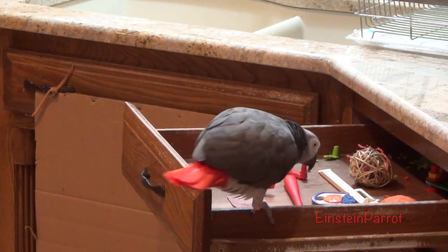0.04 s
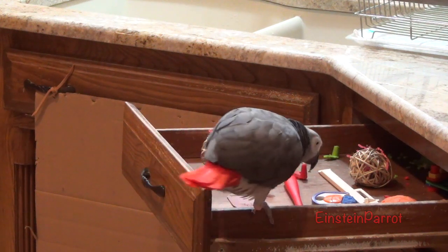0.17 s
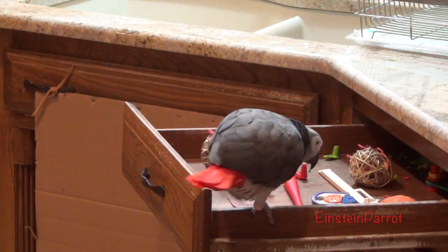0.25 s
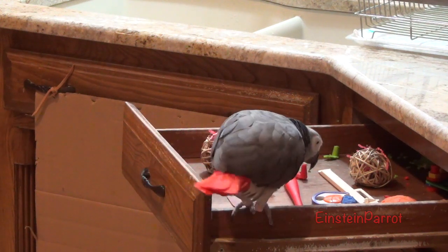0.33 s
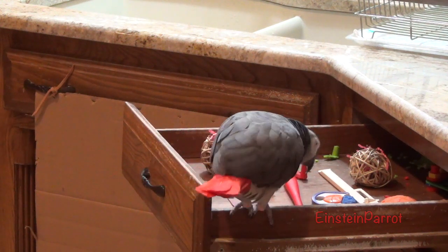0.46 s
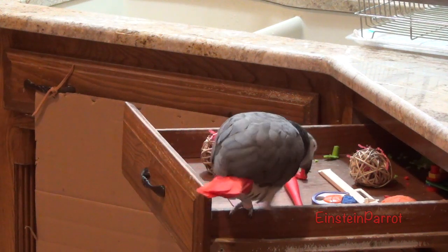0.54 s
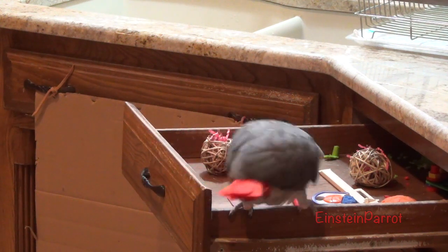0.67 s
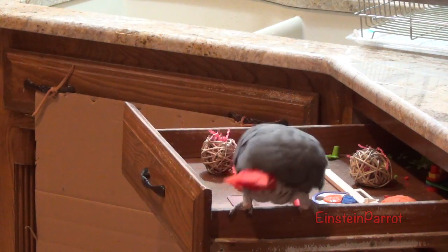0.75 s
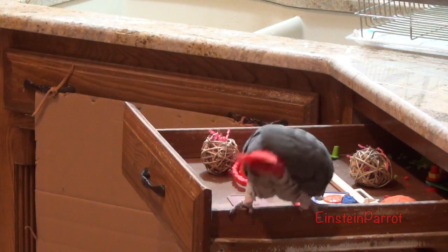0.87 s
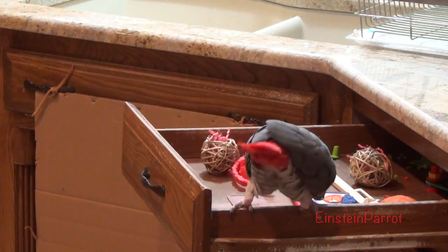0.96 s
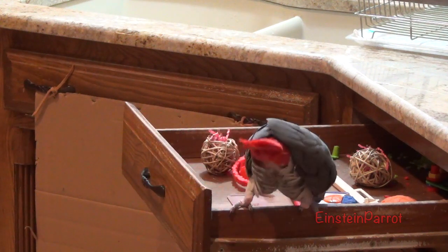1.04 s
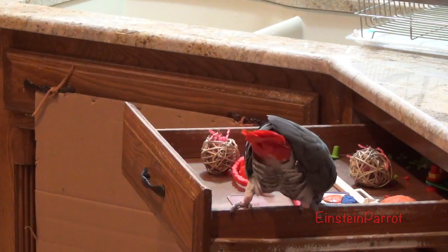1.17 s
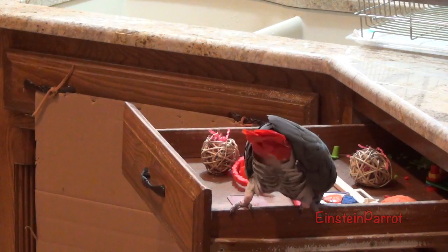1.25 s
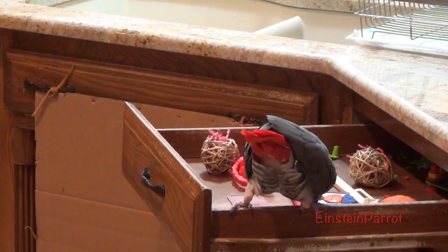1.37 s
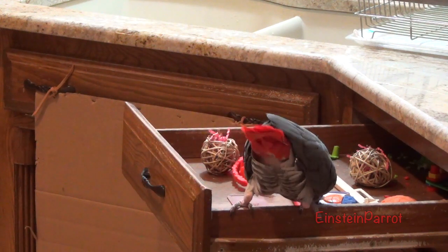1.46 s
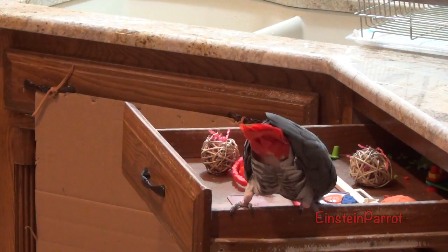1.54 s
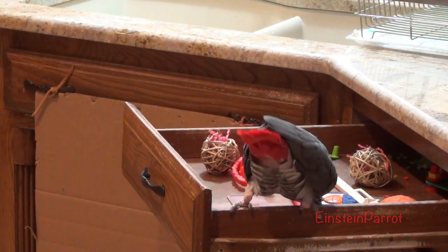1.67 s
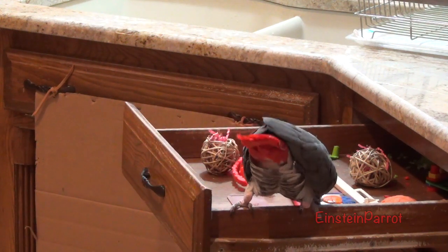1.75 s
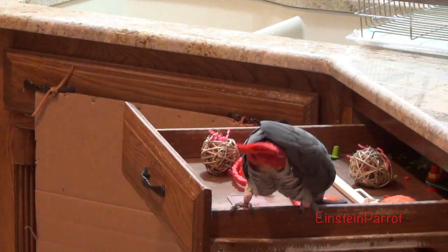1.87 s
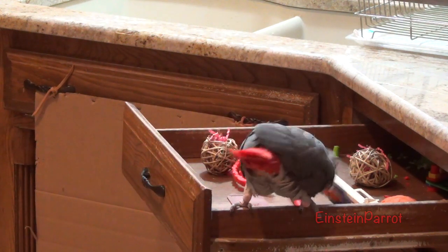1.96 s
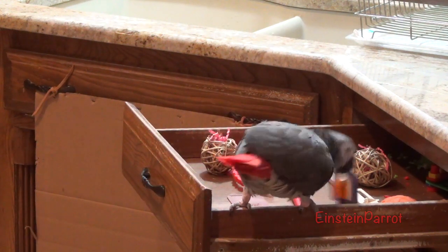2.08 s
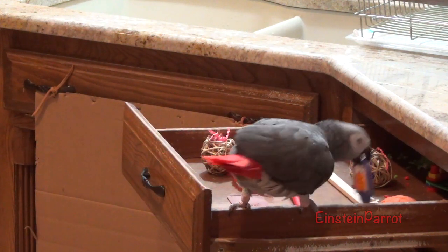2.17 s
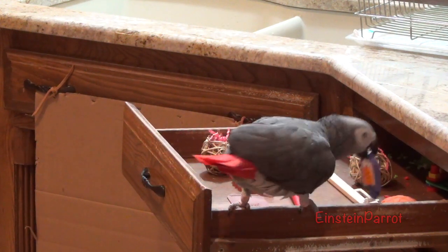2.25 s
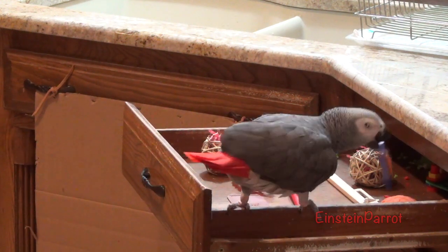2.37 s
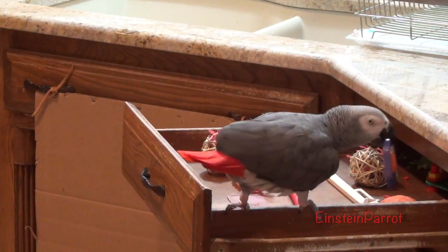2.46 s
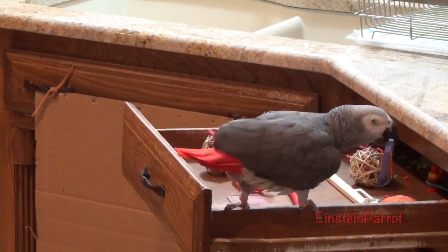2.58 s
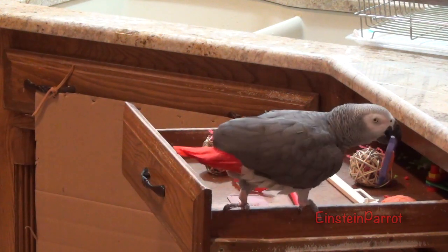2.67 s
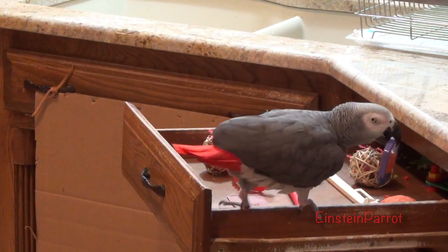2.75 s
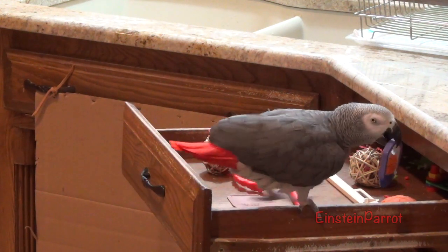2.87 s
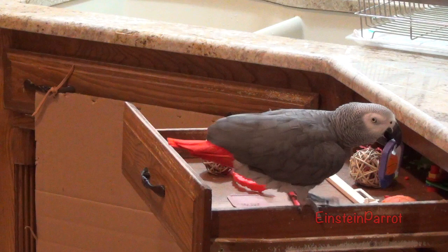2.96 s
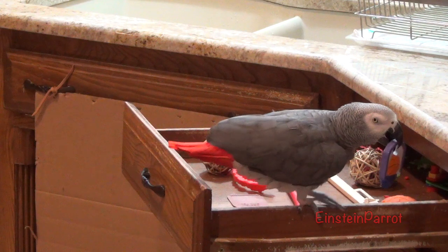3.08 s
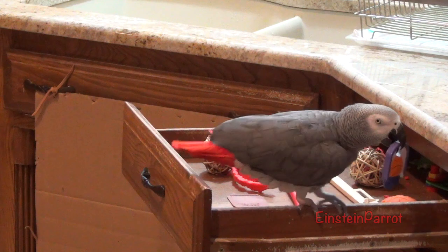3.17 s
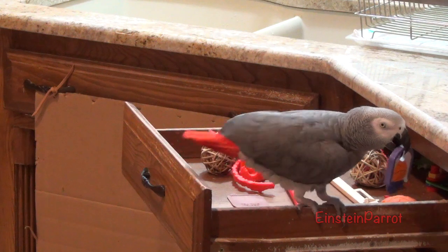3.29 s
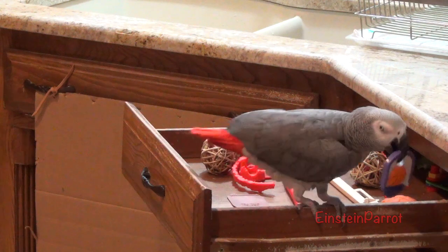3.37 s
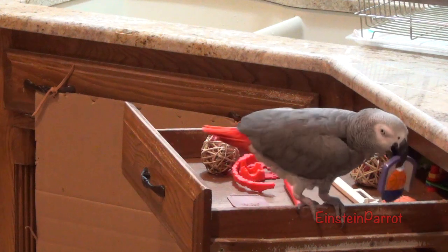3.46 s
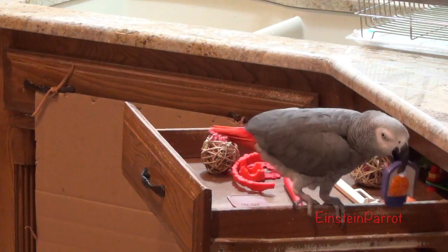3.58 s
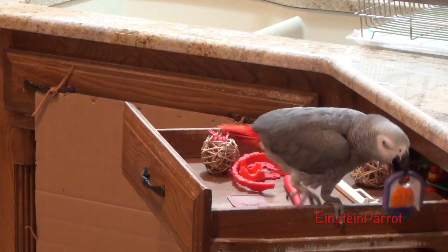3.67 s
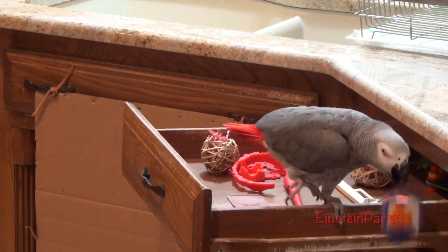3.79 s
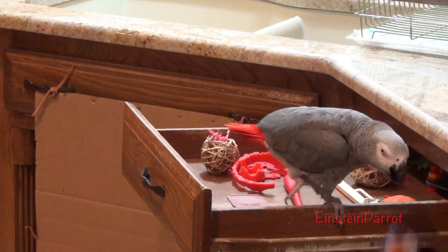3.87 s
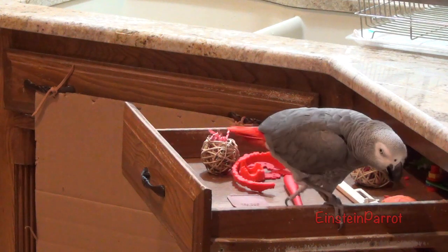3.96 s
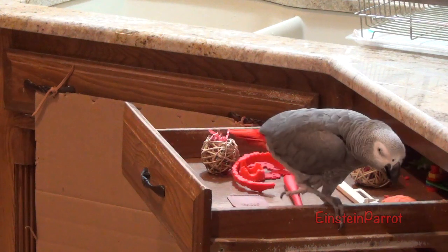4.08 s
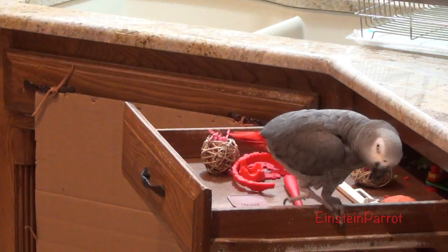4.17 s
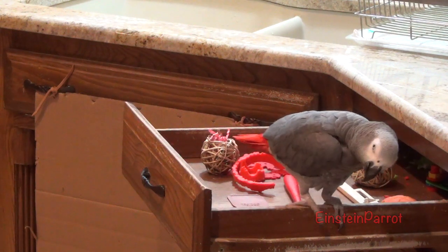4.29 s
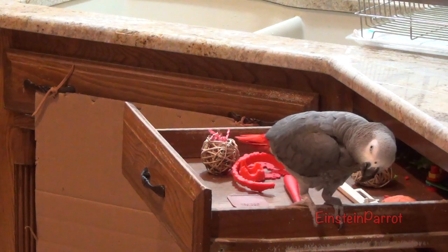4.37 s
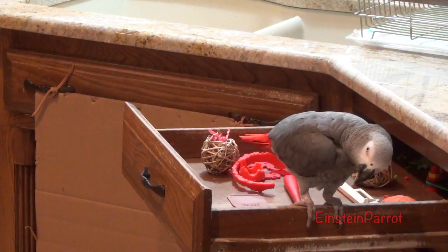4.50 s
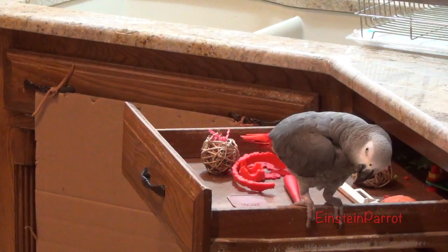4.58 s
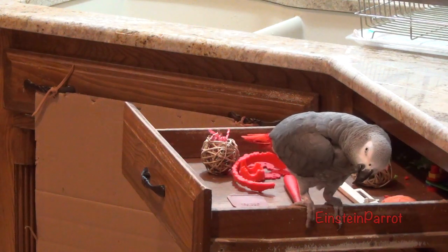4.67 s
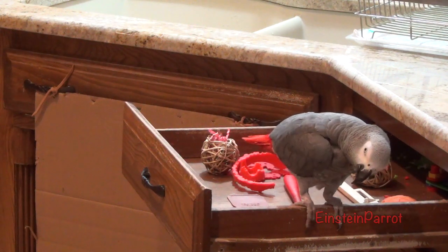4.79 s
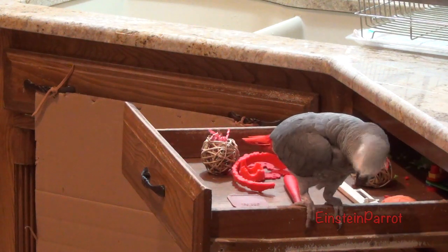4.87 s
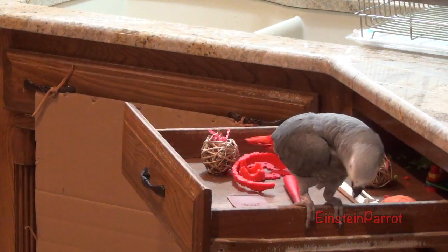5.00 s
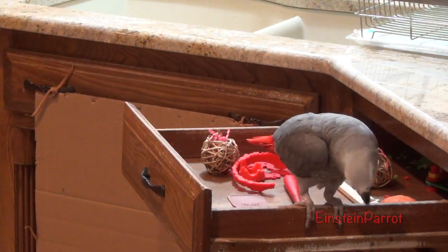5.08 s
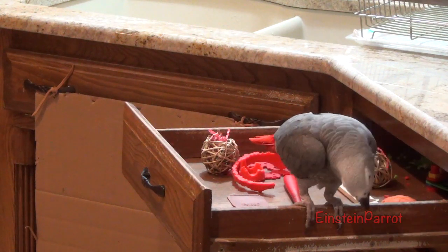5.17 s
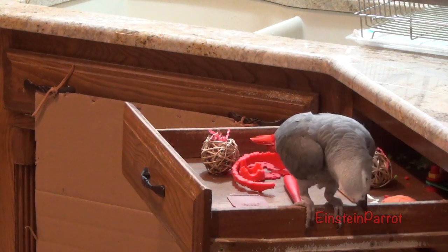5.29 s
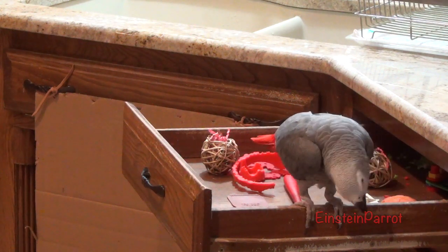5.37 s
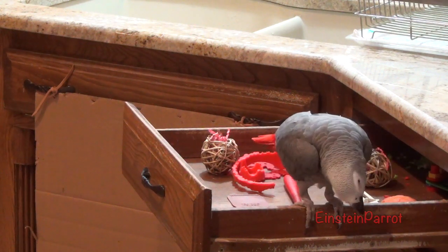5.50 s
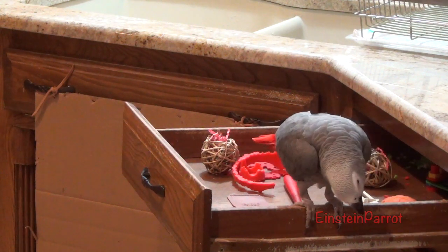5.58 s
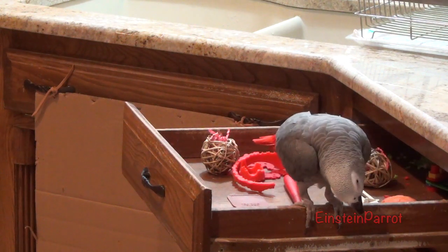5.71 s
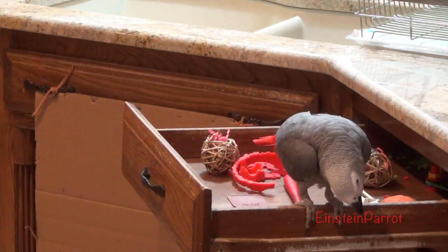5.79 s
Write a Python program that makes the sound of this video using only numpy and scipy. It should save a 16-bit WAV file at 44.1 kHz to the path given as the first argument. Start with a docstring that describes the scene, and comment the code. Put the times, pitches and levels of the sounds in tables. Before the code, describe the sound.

A parrot taps and knocks about in a wooden drawer, then drops a hard plastic toy that clatters on the kitchen floor.

```python
"""Over a faint appliance hum, a parrot scuffs and ticks on plastic toys with its claws and beak.
It is stepping about in an open wooden kitchen drawer, which knocks and judders under its feet.
Then it lets a hard, flat toy fall over the edge, to bounce and clatter on the floor below.
Each contact is a short crack plus the ringing tones of the thing struck. The kitchen echoes,
and a small camera hears it all through two close microphones."""
import sys
import numpy as np
from scipy import signal
from scipy.fft import rfft, irfft
from scipy.io import wavfile
from scipy.ndimage import uniform_filter1d, minimum_filter1d

SR = 44100
rng = np.random.default_rng(int(sys.argv[2]) if len(sys.argv) > 2 else 0)


def dump(signal):
    """Clip the signal to [-1, 1] and save it as 16-bit WAV at the path in sys.argv[1]."""
    limited = np.clip(np.atleast_2d(signal).T, -1, 1)
    pcm = np.round(limited * 32767).astype(np.int16)
    wavfile.write(sys.argv[1], SR, pcm)


N = 257544
BLOW_TIME = np.arange(int(.64 * SR)) / SR  # seconds, long enough for one blow and its echoes

# The steady hiss of the room. Each row: frequency in Hz, relative level in dB.
AIR_SPECTRUM = [(15, -37), (25, -44), (51, -0.5), (92, -5), (118, -2.5), (241, -7.5), (274, -9), (433, -10),
                (721, -16.5), (840, -10.5), (1710, -21), (2270, -21), (4870, -26.5), (6440, -22.5),
                (11000, -29.5), (14300, -66), (22000, -120)]
# Stereo width. Each row: frequency in Hz, level in dB of the side signal against the shared middle.
STEREO_WIDTH = [(60, -19.5), (900, -9), (2000, -14.5), (4500, -59.5), (7000, -29), (10000, -13)]
# The kitchen's echo. Each row: frequency in Hz, fade time in seconds (the time to lose 60 dB).
ECHO_FADES = [(150, 0.72), (500, 0.51), (1500, 0.63), (4000, 0.59), (6500, 0.43), (11000, 0.32)]
# Claws and feathers brush the toys. Each row: start and length in seconds, level and brightness in dB.
SCUFF_RUNS = [(.01, 0.039, -55.5, -7), (.15, 0.05, -52, -5), (.56, 0.1, -49, -2), (1.72, .16, -43, -4.5),
              (2.035, .035, -50, 2), (2.51, 0.23, -59, -8), (2.74, .025, -54, -4), (3.68, 0.16, -55, -5)]
# Beak and claws tap the toys. Each row: start in seconds, level in dB, brightness in dB.
TAP_HITS = [(.5095, -47.5, -3), (.5135, -37, 0.5), (.7189, -47.5, -4), (1.9506, -50.5, -5.5),
            (3.2485, -39, 4), (3.5556, -37, 1.5), (3.5592, -35, 1), (3.644, -45, -15), (5.8241, -38.5, -7)]
# Ringing tones of the small toys, the drawer and the dropped toy.
# Each row: pitch in Hz, level in dB, fade time in seconds.
SMALL_TOY_TONES = [(1674, -14.5, 0.0097), (2294, -10, 0.016), (3620, -9, 0.042), (4180, -12, .04),
                   (4770, -16, 0.018), (5910, 5.5, 0.016), (6750, 4, 0.024), (6680, 6, 0.0026),
                   (8200, -18, 0.014), (9670, -2, 0.019), (10440, -4, 0.019)]
DRAWER_TONES = [(176.3, -10, 0.15), (341, -3, 0.15), (425.5, -2.5, 0.22), (492, -3.5, 0.11),
                (609, -10.5, 0.083), (711, -13, 0.061), (783, -16, 0.13), (835, -14, 0.13),
                (892, 3.5, 0.027), (1100, -11, 0.057), (1470, -14, 0.13), (2155, -9.5, 0.056),
                (2317, -9, 0.027), (2636, 1, 0.021), (2935, -6.5, 0.035), (4100, -11, 0.009)]
DROPPED_TOY_TONES = [(1640, -19.5, .45), (1710, -13, .016), (2450, -10, .016), (3231, -12, .025),
                     (3375, -13, .08), (3585, -10, .16), (3835, -17, .25), (3928, -11.5, .18),
                     (4060, -14, .22), (4130, -11, .04), (4424, -8, .02), (5373, -7, .025), (5646, -6, .03),
                     (5957, -5, .022), (6296, -6, .022), (6430, -6, .03), (6740, -7, .013),
                     (7620, -8, .009), (8300, -14, .005), (9150, -12, .011), (10500, -13, .004)]
# The crack of the contact itself. Each row: frequency in Hz, relative level in dB.
PLASTIC_CRACK_SPECTRUM = [(60, -26), (300, -19), (550, -27.5), (900, -14), (1250, -17), (1650, -7.5),
                          (2050, -12.5), (3400, -1.5), (4400, -1), (4950, -3), (6200, 3), (8300, -3),
                          (11000, -8)]
WOOD_CRACK_SPECTRUM = [(50, -28), (130, -18.5), (250, -6), (480, 0), (900, -4), (1700, -11.5), (3000, -16),
                       (4500, -21), (6500, -20.5), (11000, -38.5)]
# How a toy's low, middle and top tones are balanced, one row for each.
# Each row: gain in dB for an ordinary blow, dB added per dB of brightness.
SMALL_TOY_BALANCE = [(2.7, -0.5), (-0.76, -0.71), (-1.9, 0.99)]
BOUNCE_BALANCE = [(-2.5, -.9), (-.5, -0.3), (-2.5, 1)]
SKITTER_BALANCE = [(-1, -0.039), (3, -1.8), (-2, -0.056)]
# The drawer knocks. Each row: start in seconds, then level, brightness and boom of the box in dB.
KNOCK_HITS = [(1.1964, -32.5, 5, -3.5), (1.4325, -35.5, 0, -4), (1.441, -36, 7, 10),
              (1.582, -42.5, -12, -17), (1.6030, -36.5, -7.5, -4), (1.6903, -27.5, -2.5, 4.5),
              (1.994, -51, 8, -2)]
# The drawer slides. Each row: start and length in seconds, level and brightness in dB.
SLIDE_RUNS = [(1.722, .085, -27, -11.5)]
# The dropped toy lands; the way it faces the camera sets how much echo is heard.
# Each row: start in seconds, then level, brightness and echo in dB.
BOUNCE_HITS = [(4.1945, -43, -11, 1), (4.1993, -12, 2, 3.5), (4.259, -17.5, -7, 5.5), (4.333, -22, 0, -0.5),
               (4.4432, -31, 6, -10), (4.4457, -15.5, -4.5, 0.5), (4.4790, -20, 4, 1.5),
               (4.5003, -13, 0.5, 5), (4.620, -22.5, 14, -10), (4.625, -22, 0, 5.5),
               (4.632, -23.5, -6.5, 8.5), (4.664, -19.5, -1, 6), (4.722, -23.5, 9, -10),
               (4.7500, -24.5, -9, 3.5), (4.7620, -20, 4.5, -2), (4.7934, -19.5, -0.5, -5),
               (4.8184, -15, 0, 5.5), (4.9386, -15.5, 0.5, 5), (4.968, -22.5, -12.5, 0.5),
               (5.0485, -28, -1, 7), (5.0618, -11.5, 2, 2.5), (5.4459, -48.5, -10, 1),
               (5.7019, -55, -10, 8)]
# It skitters along the floor. Each row: start and length in seconds, level and brightness in dB.
SKITTER_RUNS = [(4.220, 0.032, -16.5, 3.5), (4.512, .035, -16, 0.5), (4.556, 0.052, -20.5, 0.5),
                (4.953, .012, -22, -7)]
# How the microphones differ. Each row: frequency in Hz, left level minus right level in dB.
LEFT_OVER_RIGHT = [(30, 1.9), (150, 3.2), (350, 3), (900, 1.8), (2000, .1), (10000, -.4)]


def undb(db):
    """Turn decibels into a number to multiply by."""
    return 10 ** (np.asarray(db) / 20)


def unit(x):
    """Scale a sound to an energy of one."""
    return x / np.sqrt(np.sum(x ** 2))


def along(points, hz):
    """Read between (Hz, value) points, with every octave equally wide."""
    point_hz, value = np.transpose(points)
    return np.interp(np.log(np.maximum(hz, 1)), np.log(point_hz), value)


def colour(x, points, size=2048):
    """Make frequencies louder or softer, following (Hz, dB) points."""
    gain = undb(along(points, np.fft.rfftfreq(size, 1 / SR)))
    cepstrum = irfft(np.log(gain))
    cepstrum[1:size // 2] *= 2  # folded forward, so nothing rings before the sound starts
    cepstrum[size // 2 + 1:] = 0
    return signal.fftconvolve(x, irfft(np.exp(rfft(cepstrum))))[:len(x)]


def fade(fade_s):
    """A curve that falls by 60 dB in fade_s seconds."""
    return np.exp(-np.log(1000) * BLOW_TIME / fade_s)


def add(out, start_s, sound):
    """Mix one blow into the output."""
    start = int(start_s * SR)
    out[:, start:start + len(BLOW_TIME)] += sound[..., :N - start]


def each(rows, value):
    """Add the same last column to every row."""
    return [(*row, value) for row in rows]


def diffuse(size):
    """Noise arriving from all sides, nearly the same at both microphones."""
    mid, side = rng.standard_normal((2, size))
    side = colour(side, STEREO_WIDTH)
    return np.array([mid + side, mid - side])


def room_tone(air_db=-56.92, hum_hz=118.8, hum_db=-64, fan_hz=835, fan_width_hz=55, fan_db=-66.5):
    """Steady air, electrical hum and the soft note of an appliance fan."""
    air = np.array([colour(channel, AIR_SPECTRUM, size=8192) for channel in diffuse(N)])
    fan = signal.lfilter(*signal.iirpeak(fan_hz, fan_hz / fan_width_hz, fs=SR), diffuse(N))
    hum = np.sqrt(2) * np.sin(2 * np.pi * hum_hz * np.arange(N) / SR)
    return np.sqrt(2 * N) * (undb(air_db) * unit(air) + undb(fan_db) * unit(fan)) + undb(hum_db) * hum


def blow(tones, crack_spectrum, crack_db, crack_fade_s, scatter_db, detune):
    """One contact: a crack, plus tones whose strength and pitch vary a little with the spot struck."""
    chance = rng.standard_normal((len(tones), 3))
    ring = 0
    for (hz, db, fade_s), (strength, flip, shift) in zip(tones, chance):
        tone = np.cos(2 * np.pi * hz * (1 + detune * shift) * BLOW_TIME) * fade(fade_s)
        ring += undb(db + scatter_db * strength) * np.sign(flip) * unit(tone)
    crack = colour(rng.standard_normal(len(BLOW_TIME)) * fade(crack_fade_s), crack_spectrum)
    return unit(ring) + undb(crack_db) * unit(crack)


def kitchen_echo(early_db, early_fade_s=0.093, build_s=0.0043, bands=9):
    """Quick echoes off the cabinets, and a tail that dies away at its own pace in each band."""
    size = len(BLOW_TIME)
    hz = np.fft.rfftfreq(size, 1 / SR)
    centres_hz = np.geomspace(125, 12000, bands)
    noise, tail = rfft(diffuse(size)), 0
    for centre, share in zip(centres_hz, np.eye(bands)):
        band = irfft(noise * along(np.c_[centres_hz, share], hz), size)
        tail += band * (fade(along(ECHO_FADES, centre)) + undb(early_db) * fade(early_fade_s))
    return np.sqrt(2) * unit(tail * (1 - np.exp(-BLOW_TIME / build_s)))


def in_kitchen(sound, db, echo_db, early_db):
    """A blow with its echoes; db is the level of the direct sound if spread over 10 ms."""
    direct = unit(sound)
    echoes = signal.fftconvolve(direct[None], kitchen_echo(early_db), axes=1)
    echoes = np.sqrt(2) * unit(echoes[:, :len(BLOW_TIME)])
    return undb(db) * np.sqrt(SR / 100) * (direct + undb(echo_db) * echoes)


def chatter(runs, count, jitter=.4):
    """Break each run into unevenly spaced contacts that share its energy."""
    hits = []
    for start_s, length_s, db, bright_db in runs:
        places = np.arange(count) + .5 + jitter * rng.uniform(-.5, .5, count)
        hit_db = db - 10 * np.log10(count)
        hits += [(start_s + length_s * place / count, hit_db, bright_db) for place in places]
    return hits


def plastic(hits, tones, balance, crack_db, crack_fade_s, early_db, detune, gap_db, lowest_hz=300):
    """Blows on hard plastic: a sharp edge favours the top tones, a flat contact the low ones."""
    out = np.zeros((2, N))
    bass_cut = signal.butter(2, lowest_hz, "high", fs=SR)  # a small thing gives off no bass
    between_db = gap_db + crack_db / 2  # only the crack fills the gaps between groups of tones
    for start_s, db, bright_db, echo_db in hits:
        sound = blow(tones, PLASTIC_CRACK_SPECTRUM, crack_db, crack_fade_s, scatter_db=2, detune=detune)
        sound = signal.lfilter(*bass_cut, sound)
        low_db, middle_db, top_db = (base_db + slope * bright_db for base_db, slope in balance)
        sound = colour(sound, [(2540, low_db), (2940, between_db), (4220, middle_db),
                               (4700, between_db), (5200, 0), (6380, 0), (9060, top_db)])
        add(out, start_s, in_kitchen(sound, db, echo_db, early_db))
    return out


def scuffs(echo_db=3):
    """Claws and feathers brush the small toys in strings of tiny contacts, more crack than ring."""
    return plastic(each(chatter(SCUFF_RUNS, count=4), echo_db), SMALL_TOY_TONES, SMALL_TOY_BALANCE,
                   crack_db=7, crack_fade_s=0.06, early_db=-5, detune=0.01, gap_db=-11)


def taps(echo_db=2):
    """Beak and claws tap the small toys, which ring very briefly."""
    return plastic(each(TAP_HITS, echo_db), SMALL_TOY_TONES, SMALL_TOY_BALANCE,
                   crack_db=-3.5, crack_fade_s=0.057, early_db=1.5, detune=0.013, gap_db=3.5)


def drawer_knocks(hits, echo_db=-1, push_s=0.0046):
    """Softer, longer blows ring the wooden box as it rocks on its runners."""
    out = np.zeros((2, N))
    push = 1 - np.exp(-(BLOW_TIME / push_s) ** 2)  # the bird's weight comes on over a few milliseconds
    for start_s, db, bright_db, boom_db in hits:
        sound = push * blow(DRAWER_TONES, WOOD_CRACK_SPECTRUM,
                            crack_db=-3.5, crack_fade_s=0.092, scatter_db=1, detune=0.0056)
        sound = colour(sound, [(330, boom_db), (650, 0), (2200, bright_db), (6000, bright_db)])
        add(out, start_s, in_kitchen(sound, db, echo_db, early_db=-8))
    return out


def drawer_judder(boom_db=-2):
    """The drawer slides a little way along its runners in a quick string of knocks."""
    return drawer_knocks(each(chatter(SLIDE_RUNS, count=5), boom_db), echo_db=1.5, push_s=0.0069)


def bounces():
    """The dropped toy bounces and rocks to rest, ringing each time it lands."""
    return plastic(BOUNCE_HITS, DROPPED_TOY_TONES, BOUNCE_BALANCE,
                   crack_db=5, crack_fade_s=0.0072, early_db=-10, detune=0.003, gap_db=-9, lowest_hz=420)


def skitters(echo_db=8):
    """Between bounces the toy skips along the floor in quick contacts that are mostly crack."""
    return plastic(each(chatter(SKITTER_RUNS, count=3), echo_db), DROPPED_TOY_TONES, SKITTER_BALANCE,
                   crack_db=10, crack_fade_s=0.01, early_db=-8, detune=0.0031, gap_db=-6, lowest_hz=480)


def dull_pop(at_s=4.5003, db=-21, width_s=0.0003):
    """A dull, low pop is heard at one loud bounce, like a camera's limiter can make: one smooth blip."""
    return -undb(db) * np.exp(-((np.arange(N) / SR - at_s) / width_s) ** 2)


def limiter(pair, ceiling=.72, release_s=.0015, window=13):
    """The camera turns itself down just ahead of any peak over the ceiling, then recovers quickly."""
    recovery = np.arange(N) / SR / release_s
    over = np.log(np.maximum(np.abs(pair).max(axis=0) / ceiling, 1))
    gain = np.exp(recovery - np.maximum.accumulate(over + recovery))
    return pair * uniform_filter1d(minimum_filter1d(gain, window), window)


def scene():
    """The humming room, the parrot in the drawer, the toy clattering on the floor and one dull pop."""
    room = room_tone()
    parrot = scuffs() + taps() + drawer_knocks(KNOCK_HITS) + drawer_judder()
    dropped_toy = bounces() + skitters()
    return room + parrot + dropped_toy + dull_pop()


def record(dry):
    """The left microphone has more bass; the loudest peaks are held down and the top treble is cut."""
    pair = np.array([colour(channel, np.array(LEFT_OVER_RIGHT) * (1, share))
                     for channel, share in zip(dry, (.5, -.5))])
    treble_cut = signal.ellip(10, .2, 70, 11050, fs=SR, output="sos")  # above 11050 Hz
    return signal.sosfilt(treble_cut, limiter(pair))


dry = scene()
out = record(dry)
dump(out)
```